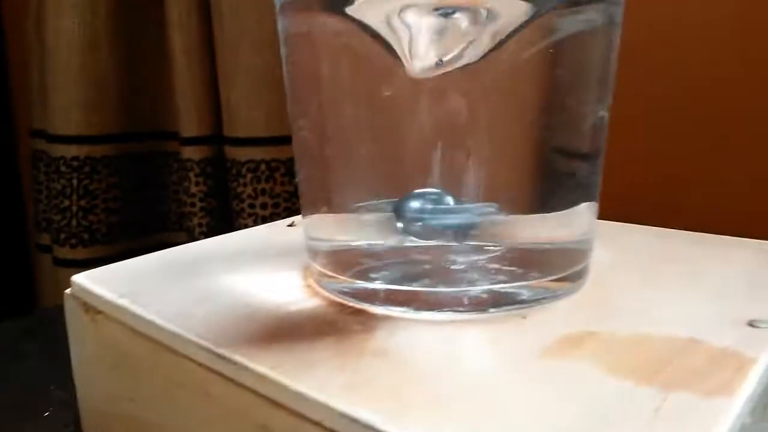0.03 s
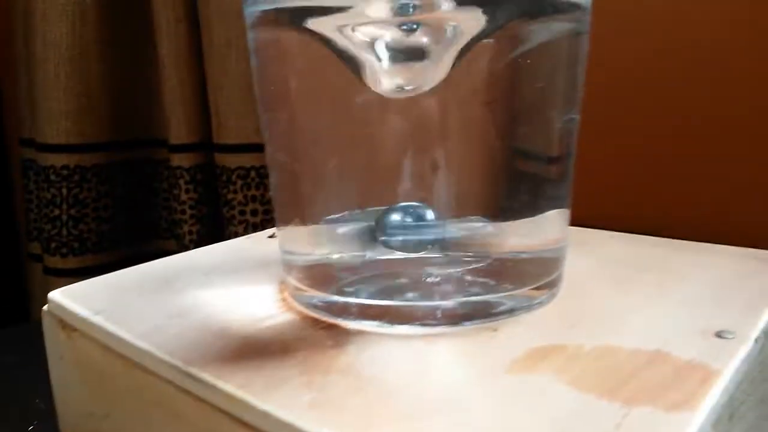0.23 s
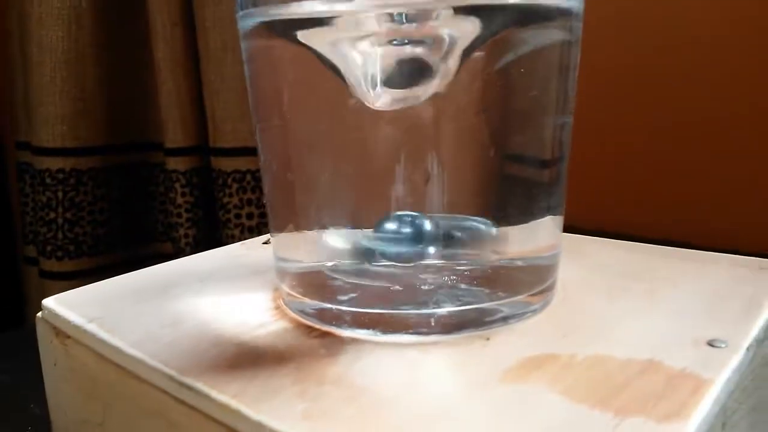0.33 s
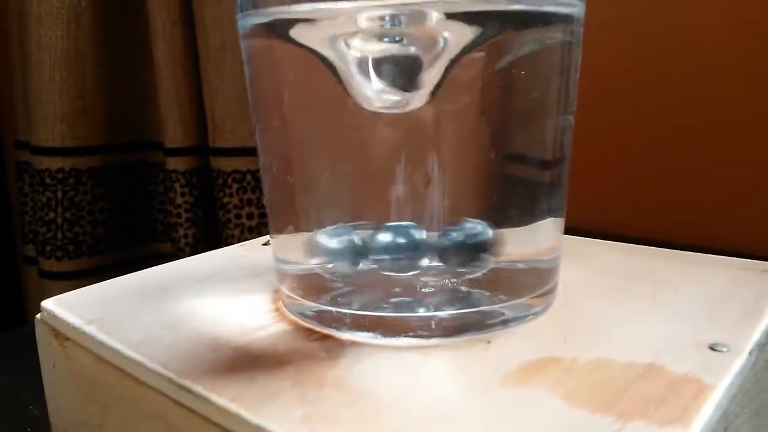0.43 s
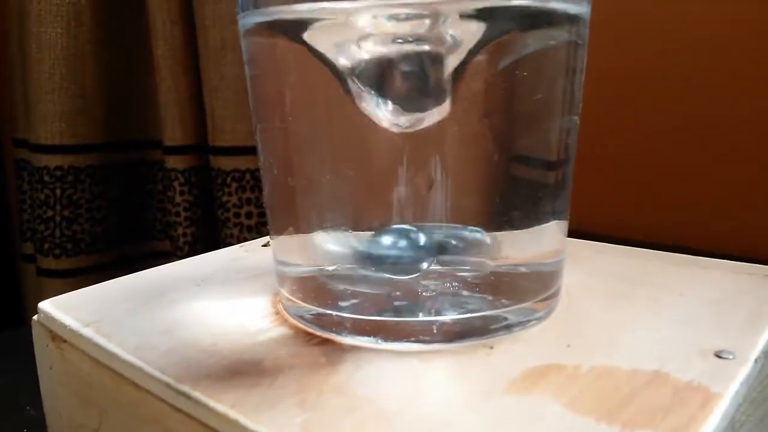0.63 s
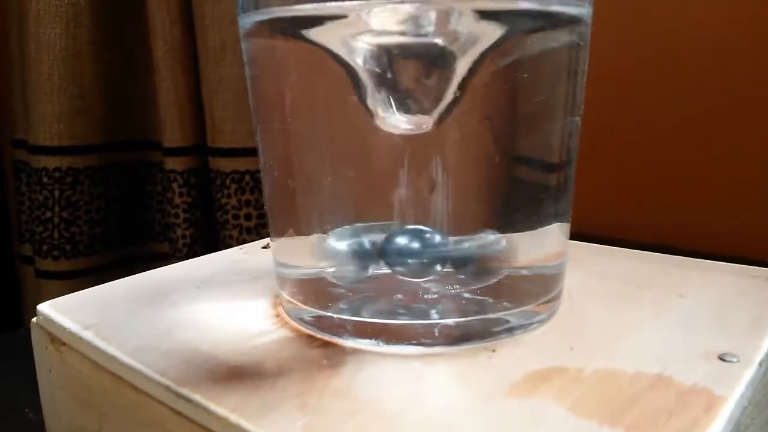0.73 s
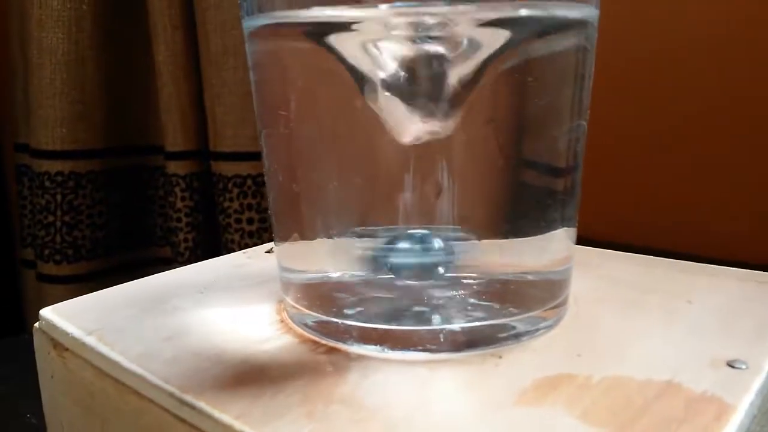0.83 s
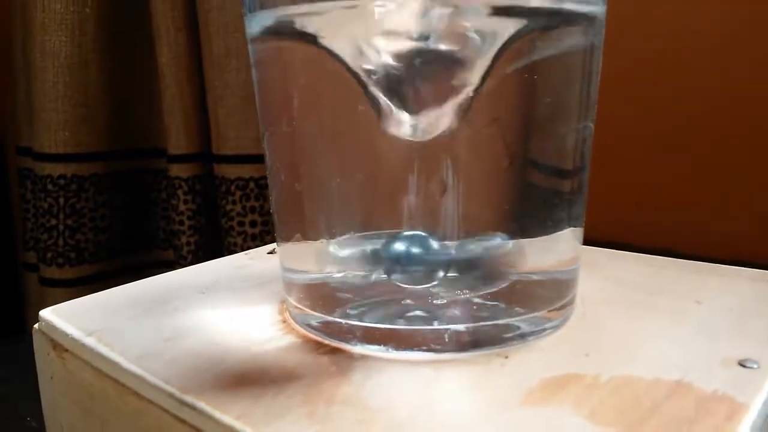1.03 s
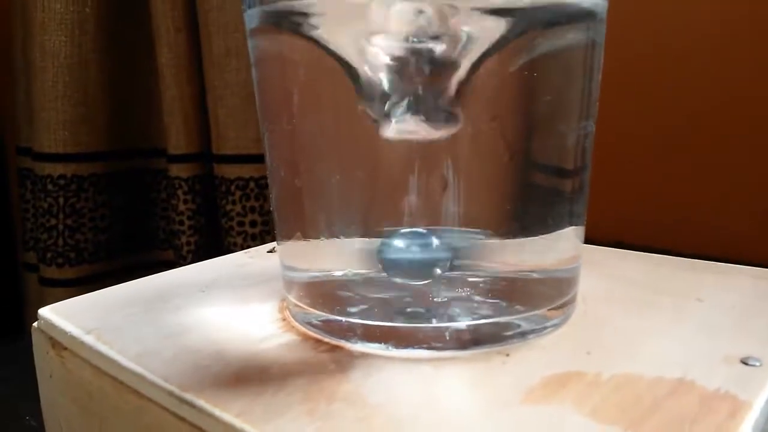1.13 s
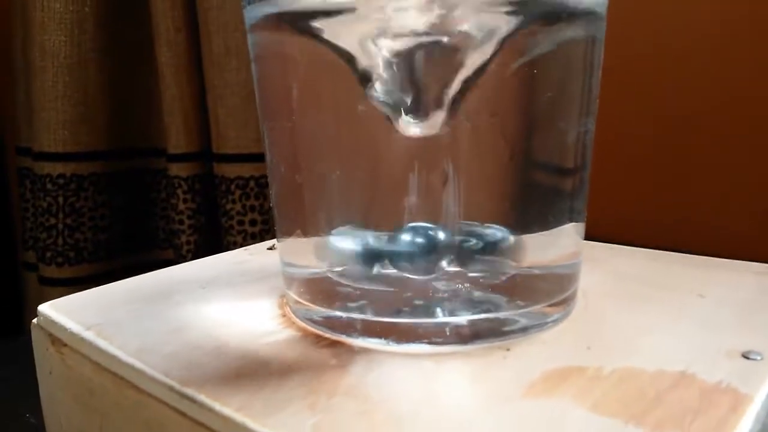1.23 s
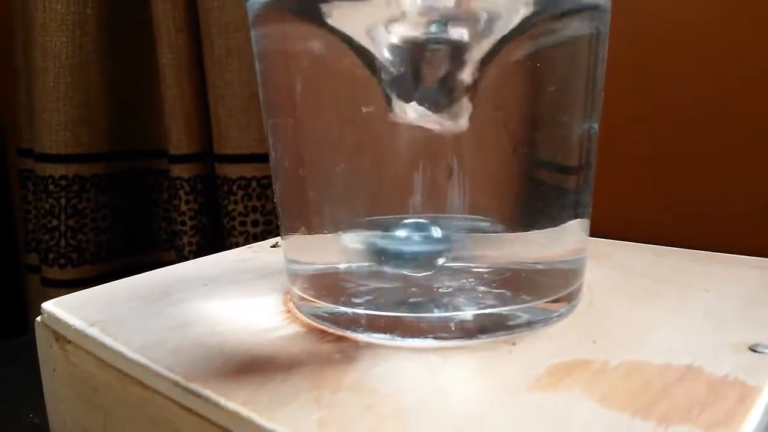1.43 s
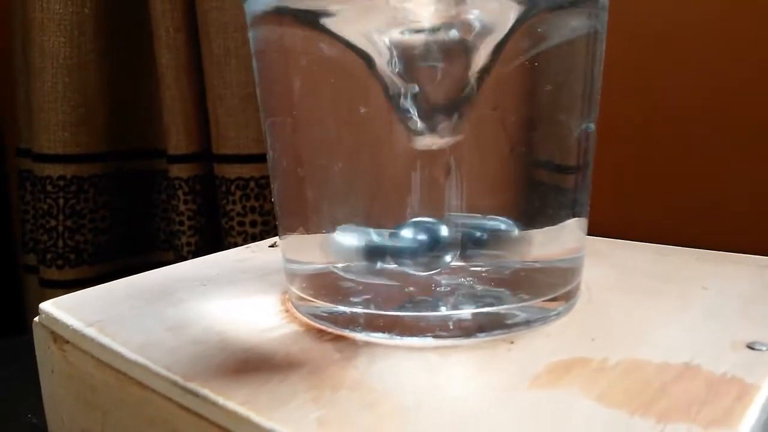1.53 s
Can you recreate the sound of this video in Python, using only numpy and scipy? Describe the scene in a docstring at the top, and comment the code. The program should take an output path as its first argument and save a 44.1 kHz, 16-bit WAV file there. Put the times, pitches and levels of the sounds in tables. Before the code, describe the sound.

A spinning magnet clinks and rattles inside a glass of water over a faint motor hum.

```python
"""A steel magnet knocks against a glass of water as it spins on a small motor-driven stirrer.
It rubs and ticks on the bottom, knocks harder and harder, then runs free. Each impact gives a brief
crack and excites the short, bright modes of the magnet and the longer modes of the glass; sliding
friction adds a scrape. Beneath, the motor hums in its box and the swirling water glugs softly.
Near surfaces and the room reflect the impacts."""
import sys
import numpy as np
from scipy import signal
from scipy.fft import rfft, irfft
from scipy.io import wavfile

SR = 44100
rng = np.random.default_rng(int(sys.argv[2]) if len(sys.argv) > 2 else 0)


def int16_out(signal):
    """Quantize to a 16-bit WAV file."""
    q = np.round(np.clip(np.atleast_2d(signal).T, -1, 1) * 32767)
    wavfile.write(sys.argv[1], SR, q.astype(np.int16))


N = 70560
T = np.arange(N) / SR
RING_T = T[:SR // 2]   # time after a blow

# Levels are relative; balance is left level minus right level.
# likeness of left and right in the noises: f/Hz, correlation
COHERENCE = [(30, 0.75), (150, 0.92), (300, 0.9), (550, 0.6), (1000, 0.1), (2500, 0.3), (5000, 0.2),
             (9000, 0.035)]
# partials of the motor's hum: f/Hz, level/dB
HUM_PARTIALS = [(117, -67), (232, -53.5), (269, -52.5), (403, -62.5)]
# rumble of the motor's box and the swirling water: f/Hz, spectral level/dB
RUMBLE_SPECTRUM = [(20, -28), (45, -8), (70, -6.5), (120, -2), (200, -2), (260, -2), (340, -3),
                   (550, -11.5), (850, -12.5), (1150, -16), (2300, -18.5), (4000, -41), (9000, -26),
                   (15000, -52)]
# envelope of hum and rumble: t/s, level/dB
MOTOR_ENVELOPE = [(0, 0), (.3, -1), (.45, -0.5), (.75, 2), (.9, 0), (1.22, 2.5), (1.38, -1), (1.6, 0)]
# low, soft glugs of the swirling water: t/s, f/Hz, peak level/dB
WATER_GLUGS = [(0.126, 115.2, -38), (0.408, 228.2, -35.5), (0.961, 233.4, -38.5), (1.136, 148.8, -41),
               (1.281, 187.4, -41.5)]
# how hard the magnet rubs on the bottom: t/s, level/dB
RUB_FORCE = [(0, 1), (.09, -1), (.19, 1.5), (.33, 3.5), (.43, 3), (.54, -4.5), (.75, 3.5), (1.05, -4),
             (1.17, 2), (1.31, -5.5), (1.38, -6), (1.6, -15.5)]
# colour of the scrape: f/Hz, spectral level/dB
SCRAPE_SPECTRUM = [(450, -7.5), (850, -6.5), (1100, -12.5), (1450, -7), (1780, 2.5), (2030, -2.5),
                   (2330, 4.5), (2720, -3.5), (2980, 1.5), (3300, -11.5), (3700, -10.5), (4700, -14.5),
                   (5600, -9.5), (6300, -11), (6650, 1), (7400, -8), (8600, -15.5), (9400, -9),
                   (10500, -19), (15000, -25)]
# crack of a contact: f/Hz, spectral level/dB
CRACK_SPECTRUM = [(150, -6), (400, -12), (800, -8.5), (1300, -8.5), (2700, -7.5), (3300, -8), (3700, -1),
                  (4150, -3), (4700, -13.5), (5600, -5.5), (6500, -0.5), (7500, 4), (8700, -4),
                  (10500, -11), (12500, -10.5), (16000, -25)]
# long ring of the glass: f/Hz, level/dB, T60/s, balance/dB
GLASS_MODES = [(2473, -31.5, .3, 1.5), (6231, -26.5, 0.23, 41), (6352, -12.5, 0.23, -2),
               (6454, -18, 0.23, 26), (7040, -22, 0.16, -21), (7757, -32, 0.14, -12), (8340, -32, 0.22, -2),
               (9300, -22, 0.083, -24), (10320, -32.5, 0.22, 0), (12208, -48, 0.19, -6)]
# short, bright ring of the magnet on the glass: f/Hz, level/dB, T60/s, balance/dB
MAGNET_MODES = [(3705, -16, 0.04, 0), (7616, -0.5, 0.041, -2), (9530, -19.5, 0.048, -9),
                (11504, -17.5, 0.045, -2), (13250, -27, 0.027, -3), (15000, -29, 0.076, 2),
                (15410, -22.5, 0.035, -2)]
# light impacts: t/s, level/dB, glass ring/dB
LIGHT_TICKS = [(.001, -33.5, 7.5), (.027, -32.5, 3), (.062, -24.5, -5.5), (.128, -25, -7), (.162, -29, 4.5),
               (.195, -31, -3), (.203, -26, 0), (.323, -33, -3), (.345, -39, -5), (.364, -28, 0),
               (.439, -28, 3), (.492, -28.5, 2), (.652, -31, 9), (.745, -23, -5), (1.13, -23, -11),
               (1.46, -40, 4)]
# hard impacts: t/s, level/dB, shift of the magnet's modes/Hz, glass ring/dB, crack/dB, balance/dB
HARD_KNOCKS = [(.2348, -20, -130, 3.5, -11.5, -18), (.241, -26.5, -120, 6, -10.5, 13),
               (0.256, -24.5, -110, -22, -11, -3), (0.423, -24, -90, 3, -7.5, -1.5),
               (0.507, -9, -110, -7.5, -16, -3.5), (.575, -13.5, -62, -3, -11, -3),
               (0.6706, -47, -88, -5, 14, 0), (0.675, -10, -52, -2.5, -19.5, -5),
               (0.7879, -17, -58, -20, -10, -4), (0.8333, -27, -13.5, -14, -17, -26),
               (.847, -11.5, -8, -4, -17, -6.5), (0.8546, -16.5, 0, 6, -8, -6),
               (0.8843, -10, 10, -17, -16, -9), (.9398, -7.5, 11, -1, -17, -4.5),
               (0.945, -11, 4, -10, -21, -8), (1.0398, -18, 27, 1.5, -13, -4),
               (1.1121, -13, 13, -25, -14, -5), (1.1797, -12, 42, -5.5, -13, -2.5),
               (1.187, -15.5, 50, -21, -26, -8), (1.2568, -21, 8, -4.5, -9.5, -4),
               (1.292, -5.5, -12, -7.5, -12.5, -4)]

BACKGROUND_BALANCE_DB, SCRAPE_BALANCE_DB, TICK_BALANCE_DB = -4.5, -8.5, -2.5
HUM_WAVER_DB, HUM_WANDER_FRACTION = 2.5, .013
RUMBLE_DB, RUMBLE_FLICKER_DB = -45, 1
SCRAPE_DB, SCRAPE_FLICKER_DB = -46, 3.38
CHATTER_PER_S, CHATTER_DB = 700, -44.5
MODE_SCATTER_DB, PHASE_SPREAD_TURNS = 0.96, 0.26
TICK_SHIFT_HZ, TICK_CRACK_DB = -110, -10.5
NEAR_DB, ROOM_DB = -10.5, -12


def from_db(db):
    """Amplitude grows tenfold for every 20 dB."""
    return 10 ** (np.asarray(db) / 20)


def pan(balance_db):
    """A level difference places a source: left and right gains with mean 1."""
    gains = from_db(np.array([[balance_db], [-balance_db]]) / 2)
    return gains / gains.mean()


def rms_one(x):
    """Normalisation to unit mean power."""
    return x / np.sqrt(np.mean(x ** 2) + 1e-20)


def at_hz(points, hz):
    """Interpolation of a spectrum on a logarithmic frequency axis."""
    f, value = np.transpose(points)
    return np.interp(np.log(hz + 1), np.log(f), value)


def decay(t60):
    """Damping: amplitude falls exponentially, by 60 dB in t60 seconds."""
    return np.exp(-np.log(1000) * RING_T / t60)


def drift(corner_hz):
    """Low-pass filtering of white noise gives a slow random fluctuation of rms 1."""
    pole = np.exp(-2 * np.pi * corner_hz / SR)
    slow = signal.lfilter([1], [1, -2 * pole, pole * pole], rng.standard_normal(2 * N))
    return rms_one(slow[N:])


def noise(spectrum):
    """Partially coherent stereo noise of a given spectrum, more alike in the bass; rms 1."""
    hz = np.fft.rfftfreq(N, 1 / SR)
    mid, side = rfft(rng.standard_normal((2, N)))
    alike = at_hz(COHERENCE, hz)
    stereo = np.sqrt(1 + alike) * mid + np.sqrt(1 - alike) * side * [[1], [-1]]
    return rms_one(irfft(from_db(at_hz(spectrum, hz)) * stereo, N))


def reflections(x, t60, delay_s):
    """Diffuse reverberation: convolution with a delayed, decaying noise, independent in each channel."""
    tail = rng.standard_normal((2, len(RING_T))) * decay(t60) * (RING_T > delay_s)
    return signal.fftconvolve(x, rms_one(tail) / np.sqrt(len(RING_T)), axes=1)[:, :N]


def motor():
    """Forced vibration: the motor's partials waver over the broadband rumble of box and water."""
    warped_time = np.cumsum(1 + HUM_WANDER_FRACTION * drift(11.96)) / SR
    hum = 0
    for hz, db in HUM_PARTIALS:
        amplitude = np.sqrt(2) * from_db(db + HUM_WAVER_DB * drift(17))
        hum += amplitude * np.sin(2 * np.pi * (hz * warped_time + rng.random()))
    rumble = from_db(RUMBLE_DB + RUMBLE_FLICKER_DB * drift(21)) * noise(RUMBLE_SPECTRUM)
    envelope = from_db(np.interp(T, *np.transpose(MOTOR_ENVELOPE)))
    return envelope * pan(BACKGROUND_BALANCE_DB) * (hum + rumble)


def glugs(rise_s=0.01):
    """Damped oscillation: bubbles in the swirling water give low, soft glugs that swell and die away."""
    out = 0
    for onset, hz, db in WATER_GLUGS:
        age = np.maximum(T - onset, 0) / rise_s
        swell = age * np.exp(1 - age)
        out += from_db(db) * swell * np.sin(2 * np.pi * (hz * T + rng.random()))
    return pan(BACKGROUND_BALANCE_DB) * out


def mode(hz, db, t60):
    """Free vibration of one mode: a damped sinusoid whose strength and phase vary from blow to blow."""
    phase = rng.random() + PHASE_SPREAD_TURNS * (2 * rng.random((2, 1)) - 1)
    amplitude = from_db(db + MODE_SCATTER_DB * (2 * rng.random() - 0.5))
    return amplitude * decay(t60) * np.sin(2 * np.pi * (hz * RING_T + phase))


def ring(shift_hz, glass_db, contact_s=0.0011):
    """Superposition: the modes of magnet and glass build up during a contact and ring together."""
    magnet = sum(pan(balance) * mode(hz + shift_hz, db, t60) for hz, db, t60, balance in MAGNET_MODES)
    glass = sum(pan(balance) * mode(hz, db + glass_db, t60) for hz, db, t60, balance in GLASS_MODES)
    return (magnet + glass) * (1 - np.exp(-RING_T / contact_s))


def rubbing():
    """Sliding friction: the magnet scrapes, and its many tiny contacts keep it and the glass ringing."""
    force = from_db(np.interp(T, *np.transpose(RUB_FORCE)))
    scrape_gain = from_db(SCRAPE_DB + SCRAPE_FLICKER_DB * drift(32.5)) * force
    scrape = scrape_gain * pan(SCRAPE_BALANCE_DB) * noise(SCRAPE_SPECTRUM)
    contacts = (rng.random(N) < CHATTER_PER_S / SR) * rng.standard_normal(N) * force
    chatter = signal.fftconvolve(contacts[None], ring(shift_hz=-110, glass_db=-5.5), axes=1)[:, :N]
    return scrape + from_db(CHATTER_DB) * pan(TICK_BALANCE_DB) * rms_one(chatter)


def knocks(crack_rise_s=0.001):
    """Impact excitation: each knock or tick of the magnet gives a broadband crack and a modal ring."""
    out = np.zeros((2, N))
    crack_noise = noise(CRACK_SPECTRUM)
    burst = decay(t60=0.06) * (1 - np.exp(-RING_T / crack_rise_s))
    ticks = [(onset, db, TICK_SHIFT_HZ, glass_db, TICK_CRACK_DB, TICK_BALANCE_DB)
             for onset, db, glass_db in LIGHT_TICKS]
    for onset, db, shift_hz, glass_db, crack_db, balance in HARD_KNOCKS + ticks:
        start = int(onset * SR)
        crack = from_db(crack_db) * np.roll(crack_noise, -start, axis=1)[:, :len(RING_T)] * burst
        blow = from_db(db) * pan(balance) * (ring(shift_hz, glass_db) + crack)
        out[:, start:start + len(RING_T)] += blow[:, :N - start]
    return out


def scene():
    """Sound pressures add: the impacts, their early and late reflections, friction, motor and water."""
    direct = knocks()
    near = from_db(NEAR_DB) * reflections(direct, t60=0.052, delay_s=0.0012)
    room = from_db(ROOM_DB) * reflections(direct, t60=0.54, delay_s=0.01)
    return direct + near + room + rubbing() + motor() + glugs()


def record(dry):
    """Soft saturation rounds the highest peaks; a steep low-pass filter removes the top of the treble."""
    ceiling, cutoff_hz = 0.79, 16300
    low_pass = signal.ellip(10, .1, 80, cutoff_hz, fs=SR, output="sos")
    return signal.sosfilt(low_pass, ceiling * np.tanh(dry / ceiling))


dry = scene()
out = record(dry)
int16_out(out)
```